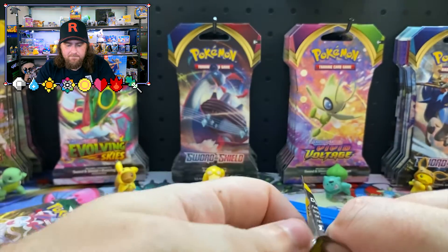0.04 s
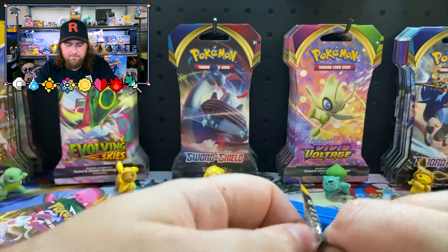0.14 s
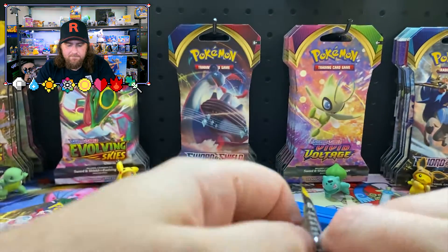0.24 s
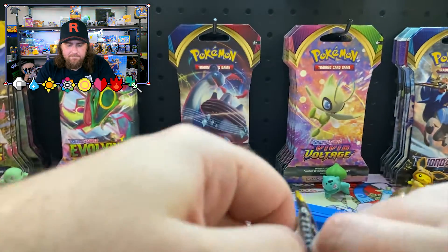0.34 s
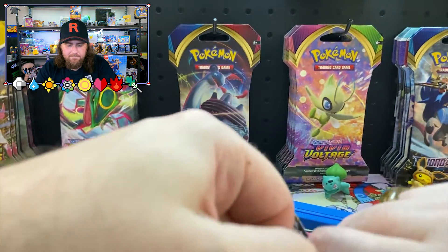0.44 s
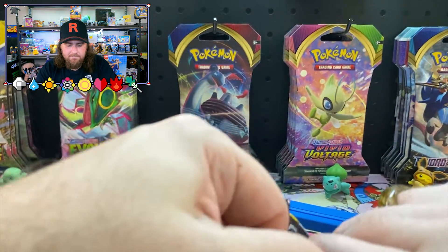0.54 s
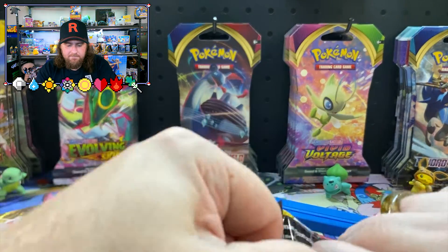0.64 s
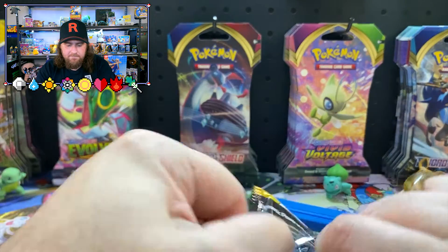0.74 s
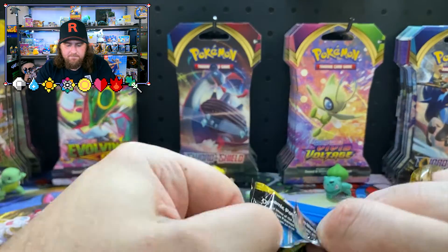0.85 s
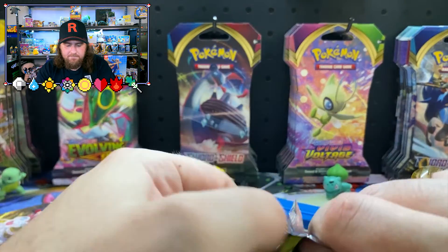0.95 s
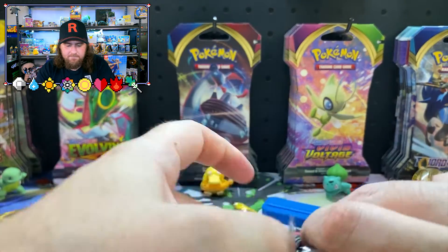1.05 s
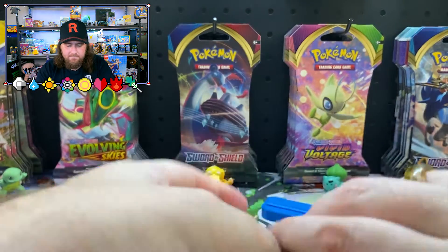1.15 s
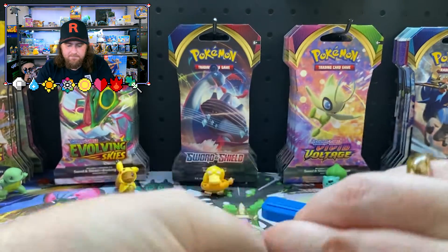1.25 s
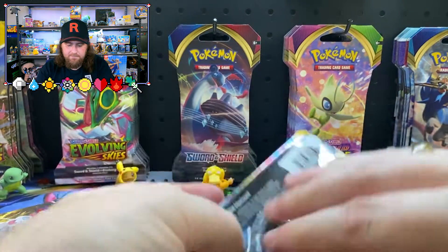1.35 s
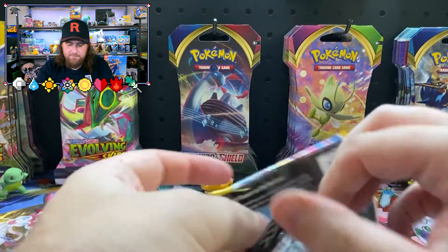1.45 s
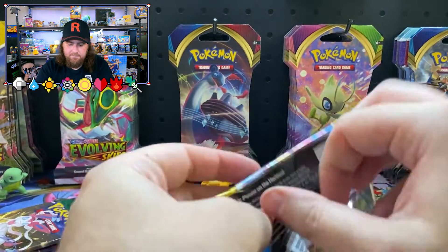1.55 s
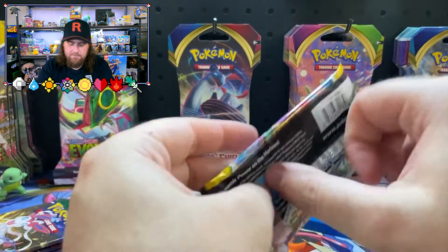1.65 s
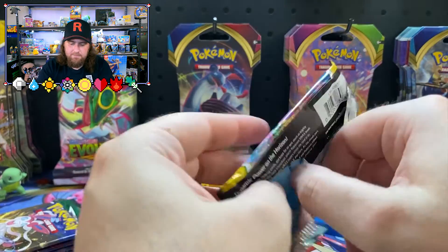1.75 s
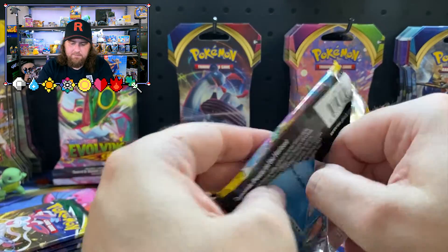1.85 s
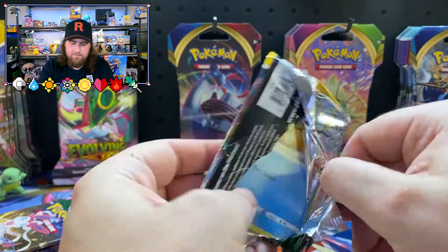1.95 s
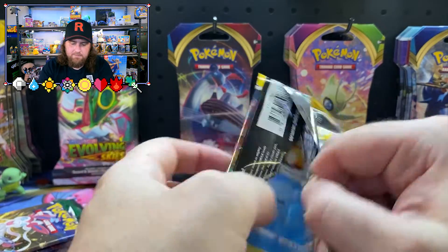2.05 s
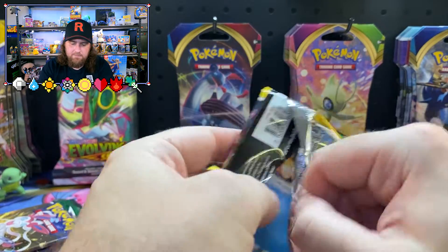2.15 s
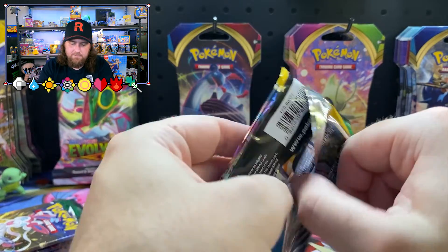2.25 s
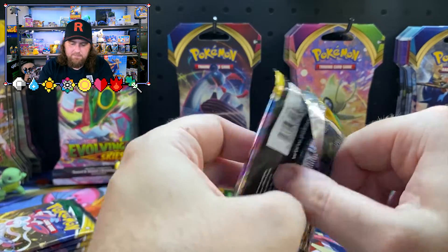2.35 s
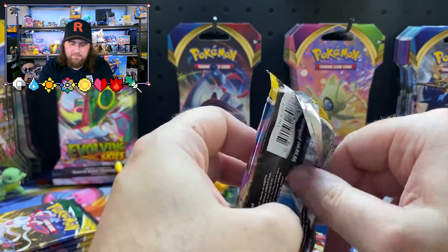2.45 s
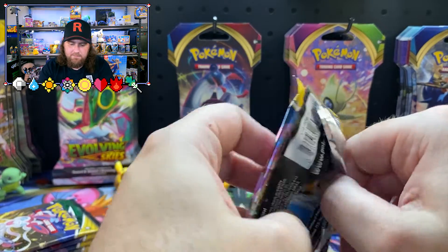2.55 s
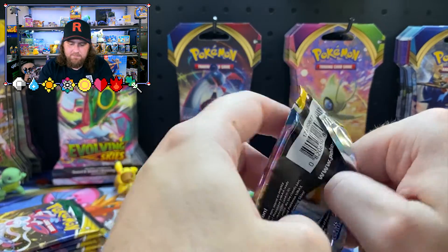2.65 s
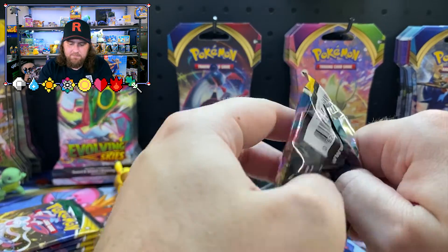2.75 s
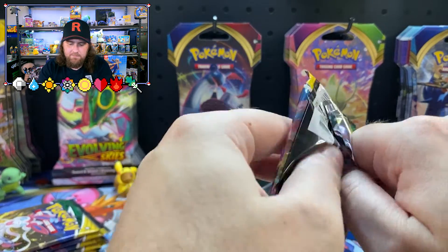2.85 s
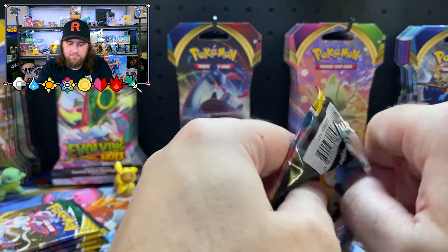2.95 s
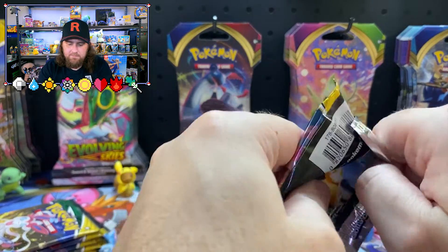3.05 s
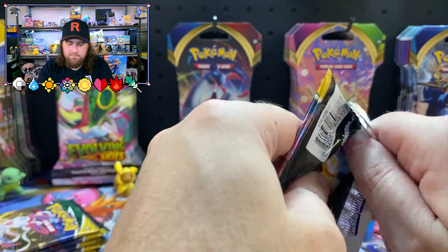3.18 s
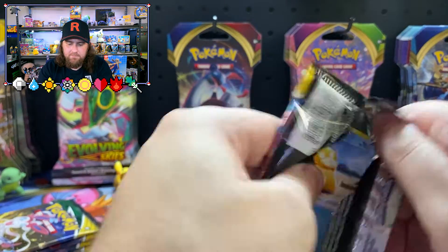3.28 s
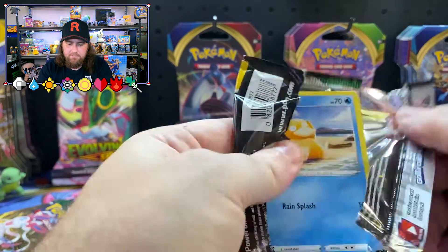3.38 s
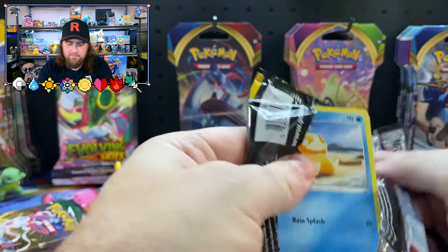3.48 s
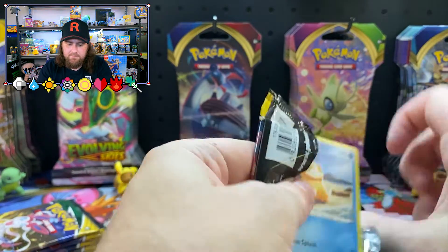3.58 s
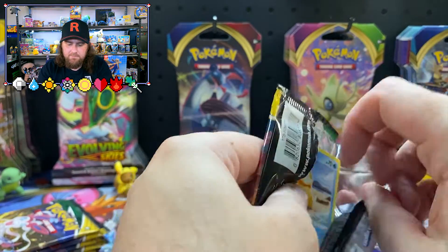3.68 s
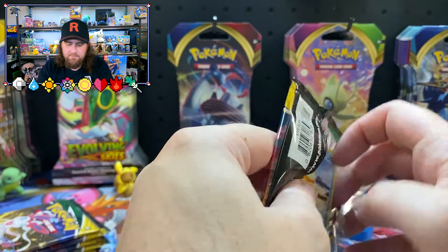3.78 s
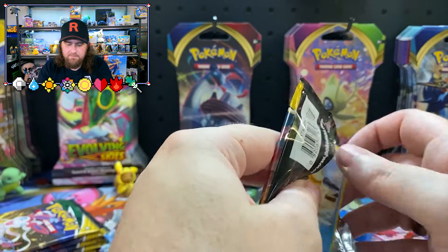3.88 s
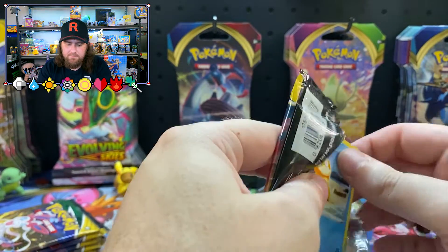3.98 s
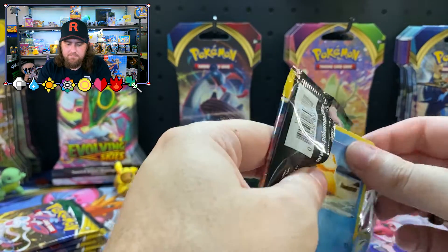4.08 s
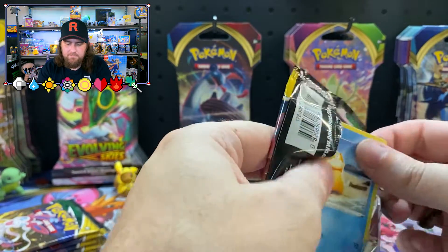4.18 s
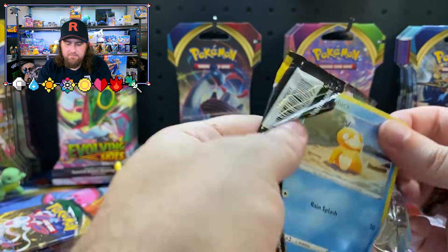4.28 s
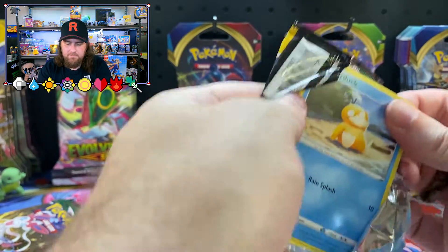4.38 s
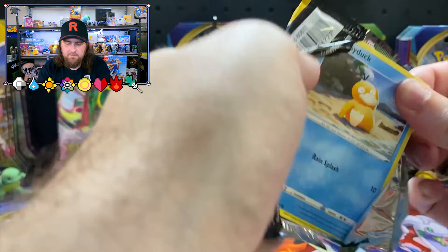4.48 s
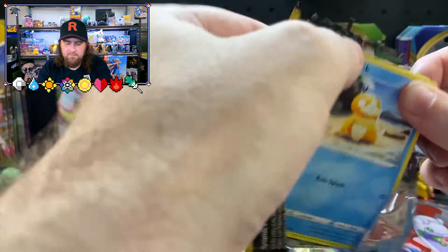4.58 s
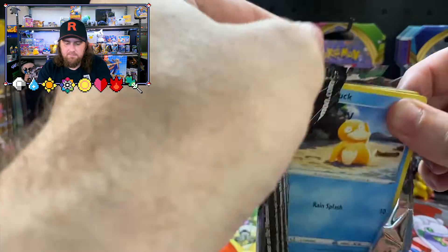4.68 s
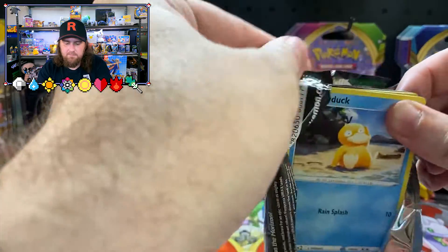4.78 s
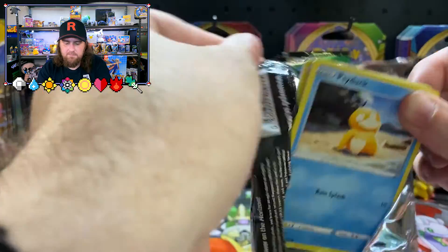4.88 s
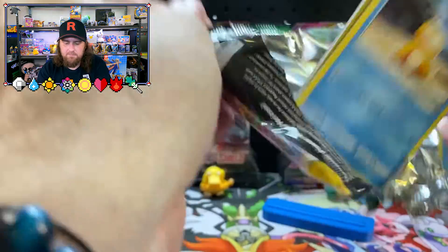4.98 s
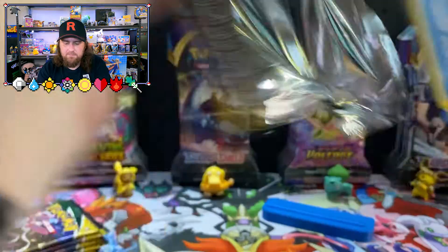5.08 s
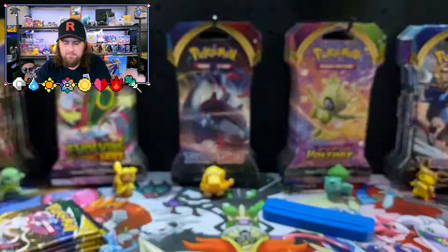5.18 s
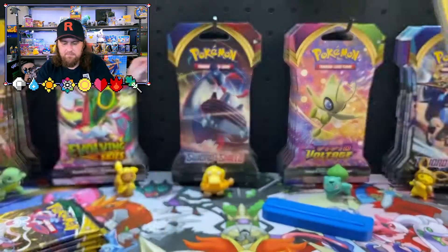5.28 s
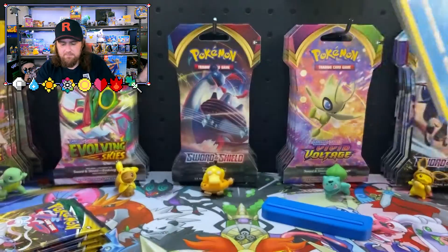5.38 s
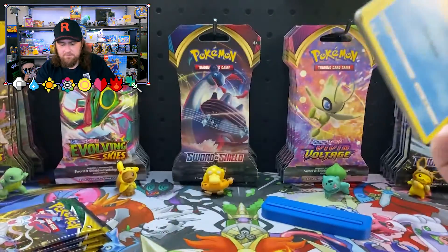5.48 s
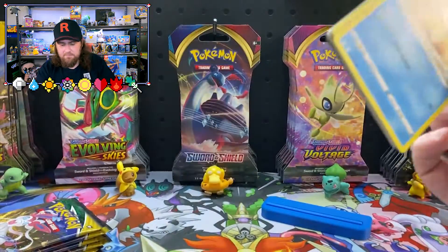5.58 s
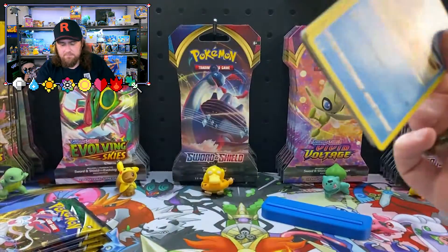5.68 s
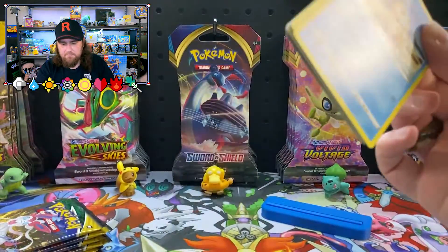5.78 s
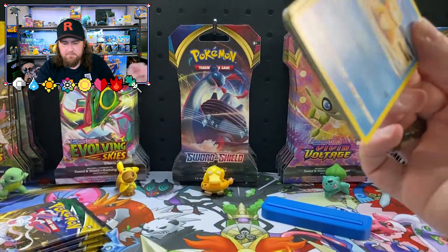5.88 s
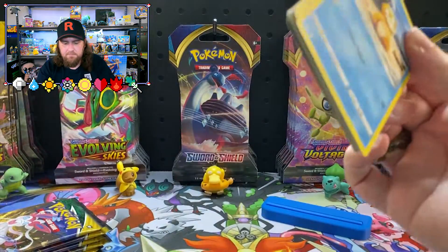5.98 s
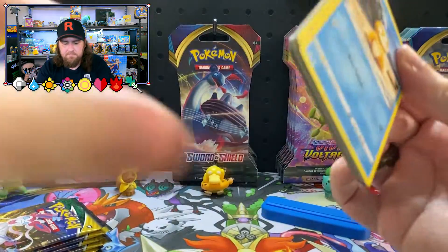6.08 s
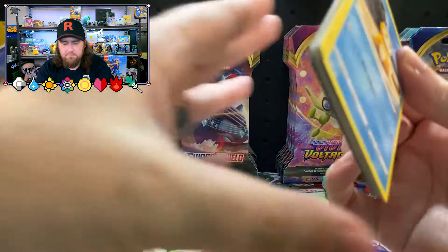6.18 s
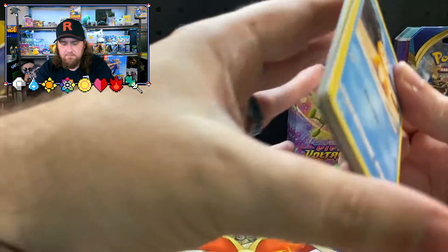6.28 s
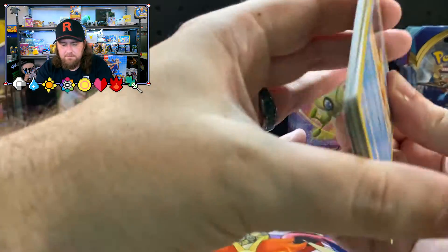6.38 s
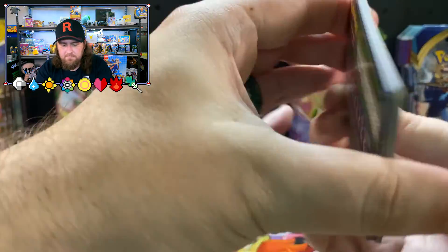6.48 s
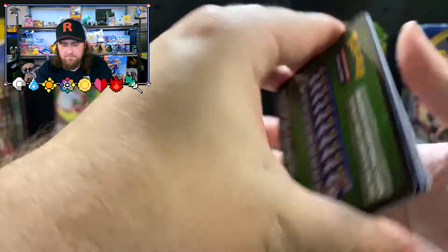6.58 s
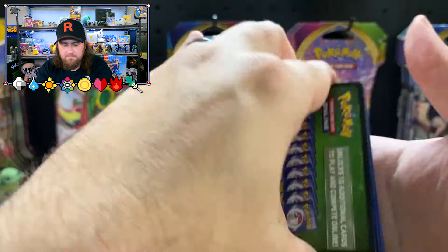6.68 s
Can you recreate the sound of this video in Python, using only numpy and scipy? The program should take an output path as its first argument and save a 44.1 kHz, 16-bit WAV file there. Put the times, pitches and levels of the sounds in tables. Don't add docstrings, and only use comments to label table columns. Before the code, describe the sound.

A close, dry take of foil being opened over a desk, with low air hiss and a faint wavering fan hum behind. From 0 to 0.7 seconds fingers squeeze the taut pack: fine crackle and small bright snaps. At about 0.8 the seam gives a loud sharp rip, then snaps scatter until 1.5 with soft knuckle bumps. From 1.65 to 2.65 the opening is spread in irregular crisp crinkles. Pulling tightens from 2.7, growing denser to the strongest tearing burst at 3.2 to 3.5, with a hollow papery rumble and another snap near 3.67. Lighter peeling runs from 3.8 to 4.4. Cards are drawn out from 4.5 to 5.2, rustling briskly with a hard snap near 5.1. The wrapper lands around 5.45 with clicks and a soft thud. Afterwards it is nearly quiet, with sparse thin card-edge ticks and a faint slide around 6.06.

```python
import sys
import numpy as np
from scipy import signal
from scipy.fft import rfft, irfft
from scipy.io import wavfile
from scipy.ndimage import uniform_filter1d

SR = 44100
rng = np.random.default_rng(int(sys.argv[2]) if len(sys.argv) > 2 else 0)


def waveform_to_disk(signal):
    frames = np.transpose(np.atleast_2d(signal))
    scaled = np.clip(frames, -1, 1) * 32767
    samples = np.round(scaled).astype(np.int16)
    wavfile.write(sys.argv[1], SR, samples)


def ratio(d):
    e = np.asarray(d, float) / 20
    return 10 ** e


N = 296793

# [f/Hz, level/dB per Hz]
AIR_SPECTRUM = [(12, -28), (20, 6.5), (138, -6.5), (210, -1.5), (347, -2.5), (472, -17), (590, -10.5),
                (923, -15.5), (1440, -16.5), (1810, -20), (2670, -29), (14300, -43.5), (16000, -40)]
# [f/Hz, width/Hz, level/dB]
FAN_NOTE = (208, 5.9, -63)

# [f/Hz, level/dB per Hz]
FOIL_SPECTRUM = [(800, -3), (1050, 3), (1500, -0.5), (2300, -3), (3000, 0), (4600, 1), (6500, -7),
                 (10000, -5), (15000, -15)]
# [t/s of firmest grip, crackle level/dB, build/s per 10 dB, ease/s per 10 dB]
SQUEEZES = [(.1, -57.5, 0, -0.17), (.36, -48.5, -0.3, -0.5), (.72, -64, 0.5, -3.4), (1.1, -53.5, 0.3, 0.17),
            (1.5, -58.5, 0.37, 0.25), (1.75, -60, 0.17, .06), (1.95, -59, 0.32, -0.5),
            (2.17, -45, -0.01, 0.11), (2.27, -54.5, 0.15, 0.1), (2.6, -53, 0.2, -0.1),
            (2.85, -50.5, 0.35, 0), (3.08, -47.5, 0.13, -0.12), (3.24, -42, 0.13, -0.04),
            (3.5, -55.5, -1, 0.06), (3.67, -34.5, -0.02, 0.042), (3.88, -42.5, 0, -0.03),
            (4.1, -46, .11, -0.03), (4.71, -48, 0.03, -0.08), (4.93, -53.5, -0.52, 0.25),
            (5.19, -46, 0.1, -0.1), (5.45, -70, .4, 0.5), (6.7, -65.5, -0.7, .3)]
RESTING_DB = -72

# [t/s, level/dB, ring f/Hz, edge level/dB rel, above 8 kHz]
PINCH_SNAPS = [(0.101, -36, 4800, -9), (0.3116, -33, 4500, -26), (0.485, -49, 7900, -14),
               (0.513, -41.5, 4100, -2), (0.5395, -30, 7700, -10), (0.5383, -42, 4140, -10),
               (0.5583, -28.5, 4320, -10), (0.5814, -30, 4540, -26), (0.6046, -44, 4040, -7),
               (0.7416, -35.5, 4400, -14), (0.774, -44, 5280, -16), (0.784, -32, 5310, -12),
               (0.7932, -21.5, 4630, -16)]
# [t/s, level/dB, ring f/Hz, edge level/dB rel, above 8 kHz]
DROP_SNAPS = [(5.3675, -40, 2120, -2.5), (5.3871, -36.5, 2960, -5), (5.441, -24.5, 5850, -5),
              (5.451, -32, 3620, -4), (5.455, -26, 2600, -2), (5.4724, -35, 2740, -5),
              (5.4842, -36, 2720, -11), (5.7385, -32.5, 5230, -7), (5.895, -58, 2240, 1),
              (6.0343, -48.5, 3610, -3), (6.2526, -36.5, 7740, 3), (6.274, -41.5, 7890, -7),
              (6.4628, -47.5, 8230, -6)]
# [t/s, level/dB, ring f/Hz,
# panel level/dB rel, below 1.8 kHz]
LOOSE_SNAPS = [(0.7753, -41, 5500, -22), (0.7753, -41, 5400, -27), (0.7952, -19.5, 3000, -25),
               (0.8037, -25, 4700, -28), (0.8033, -14.5, 4650, -20), (0.8636, -17, 3040, -13),
               (0.927, -27.5, 4560, -22), (0.9421, -24, 3220, -14.5), (0.9713, -29.5, 4530, -15),
               (1.0078, -52, 5490, -2), (1.0078, -29, 3980, -20), (1.0352, -26, 4160, -12),
               (1.0736, -38, 3140, -8), (1.0715, -26, 3230, -13), (1.1723, -37.5, 2220, -11),
               (1.173, -32, 4080, -17), (1.269, -37.5, 4440, -4), (1.2926, -37, 5170, -15),
               (1.3779, -23, 3600, -17), (1.3791, -24, 4230, -35), (1.4606, -30.5, 4330, -10.5),
               (1.497, -47, 4100, -8), (1.5147, -36, 5070, -24),
               (1.6566, -30, 3900, -17), (1.6729, -22, 4070, -12), (1.719, -23.5, 7170, -23),
                (1.8122, -27, 4760, -31), (1.8503, -39, 3470, -16), (1.885, -40.5, 4300, -10),
                (1.9176, -44, 4160, 4), (1.9178, -31, 4770, -14), (1.963, -34, 7100, -21),
                (1.9804, -37, 5550, -17), (2.0037, -34.5, 4800, -9.5), (2.0373, -42, 7080, -11),
                (2.0369, -22.5, 4810, -18.5), (2.0555, -18.5, 5150, -8), (2.1163, -29.5, 4170, -5),
                (2.1281, -23, 5300, -16), (2.1549, -27, 3570, -13), (2.2487, -28.5, 5200, -19),
                (2.2965, -30, 4250, -20), (2.334, -32, 4000, -30), (2.3452, -21.5, 5330, -29),
                (2.4, -27.5, 2200, -11), (2.458, -35.5, 3960, -14), (2.5036, -24, 5600, -20),
                (2.5617, -35, 5460, -10), (2.5681, -36, 5430, -11), (2.5686, -24.5, 4300, -21),
                (2.614, -35, 4290, -17), (2.633, -21, 2870, -27),
               (2.7223, -46, 2900, -22), (2.7355, -32, 4100, -15), (2.7689, -29.5, 3950, -8),
              (2.7961, -51, 2980, 0), (2.797, -32, 2970, -25), (2.8198, -35.5, 4120, -2.5),
              (2.833, -38, 7620, -4), (2.834, -22, 4240, -9), (2.852, -27, 5720, -9),
              (2.8751, -28.5, 2920, -5), (2.9515, -43.5, 3420, -18), (2.9768, -35.5, 2940, -3.5),
              (2.991, -33.5, 3590, -30), (3.0063, -27.5, 4760, -18.5), (3.0331, -30.5, 2920, -12.5),
              (3.0643, -19.5, 4490, -23), (3.104, -25.5, 3930, -15), (3.1483, -20.5, 2970, -20),
              (3.1942, -36, 3480, 1), (3.1938, -16, 4010, -22.5), (3.2391, -22, 3910, -18),
              (3.2455, -15, 4950, -28.5), (3.2957, -19, 5450, -45.5), (3.3166, -23.5, 2920, -21),
               (3.2962, -17, 5410, -47), (3.318, -21.5, 5020, -21.5), (3.3308, -21.5, 3930, -10),
               (3.3693, -13.5, 3300, -16.5), (3.378, -14, 4880, -17), (3.4035, -17.5, 3425, -14),
               (3.4149, -14.5, 3460, -23), (3.449, -19.5, 4900, -17), (3.451, -20.5, 3910, -2.5),
               (3.5228, -30, 5000, -32.5), (3.5585, -39, 5250, -7), (3.5595, -25.5, 3890, -43),
               (3.5845, -42, 8930, -7.5), (3.5859, -26.5, 5280, -15), (3.6104, -31, 2770, -26),
               (3.6333, -29, 5200, -17), (3.666, -32, 4130, -8.5), (3.667, -16.5, 3800, -24),
               (3.769, -40, 6300, -5),
               (3.7693, -32, 6140, -13.5), (3.8087, -34, 4900, -9), (3.8459, -41, 3100, -11),
              (3.8714, -31.5, 6500, -13), (3.9508, -36.5, 4010, -11), (3.9695, -24, 6600, -13),
              (4.0238, -36.5, 4630, -6), (4.0359, -29.5, 5900, -7.5), (4.0888, -26.5, 5900, -11),
              (4.144, -34, 5900, -11), (4.1916, -44.5, 4960, -8), (4.3103, -42, 3770, -19),
              (4.3225, -28.5, 4000, -22), (4.358, -34, 4900, -26), (4.3685, -30, 4230, -17),
              (4.4052, -33, 4250, -16),
               (4.538, -39.5, 3700, -7), (4.5635, -42.5, 3070, -2), (4.5787, -34, 4000, -8),
              (4.5948, -24.5, 3030, -5.5), (4.6237, -31, 4730, -16), (4.66, -42.5, 6540, -17),
              (4.6767, -31.5, 3120, -10), (4.7139, -22, 4600, -11), (4.7139, -23, 2970, -6.5),
              (4.835, -24, 3500, -18), (4.8434, -29, 3010, -8), (4.8437, -23.5, 4640, -19),
              (4.867, -38, 3050, -24), (4.9137, -30, 2980, -13.5), (4.9369, -23.5, 3050, -20),
              (4.9732, -26, 3090, -12), (5.006, -25.5, 4200, -19), (5.0462, -38, 2890, -17),
              (5.0733, -25.5, 4400, -15), (5.0912, -14, 3010, -18), (5.15, -32, 5700, -23),
              (5.1617, -37, 2770, -17), (5.1782, -21.5, 3140, -22.5)]
TAUT_PANEL_DB = -27.5
LOOSE_EDGE_DB, EDGE_DB_PER_OCTAVE, EDGE_SCATTER_DB = -9, 3.0, 2.5
CARDS_FROM_S = 5.6

# [t/s of peak, foil level/dB, body level/dB, build/s, ease/s per 10 dB]
TUGS = [(0.807, -12.5, -41.5, -0.15, -0.1249), (0.853, -28, -47, -0.003, 0.1269),
        (2.01, -35.5, -56, -0.01, 0.14), (2.064, -33.5, -70, 0.01, -0.08),
        (3.342, -31, -56.5, 0.01, 0.0836), (3.371, -28, -53, -0.0771, 0),
        (3.407, -30, -39.5, 0.1187, 0.0973), (3.454, -18.5, -30.5, 0, -0.0138),
        (4.368, -35, -60.5, .045, .036), (5.071, -34, -56, 0.1, 0.0135),
        (5.096, -27.5, -50, 0.0229, -0.0967), (6.061, -47.5, -59, -0.04, -0.05)]
# [f/Hz, level/dB per Hz]
BODY_SPECTRUM = [(130, -14), (290, 0), (600, -1), (1000, -7), (1500, -15), (2500, -30)]
BODY_LAGS = 0.95

# [t/s, peak level/dB, f/Hz]
BUMPS = [(.942, -34, 564), (1.072, -37.5, 660), (1.172, -40, 530), (2.398, -35.5, 315), (3.24, -35, 250),
         (3.866, -36, 295), (4.084, -36, 222), (4.714, -35.5, 453), (5.069, -37.5, 116), (5.178, -41, 149),
         (5.453, -29.5, 320), (5.455, -34.5, 126)]

# [delay/ms, level/dB, dull above f/Hz]
DESK_ECHO = (1.425, -15, 2400)
# [f/Hz, T60/s]
ROOM_T60 = [(500, .3), (1500, .33), (4000, .38), (9000, .36), (14000, .27)]


def rms_one(x):
    return x / np.sqrt(np.mean(x ** 2) + 1e-20)


def read_curve(hz, points):
    point_hz, values = np.array(points).T
    return np.interp(np.log(hz), np.log(point_hz), values)


def colour(x, points):
    hz = np.maximum(np.arange(len(x) // 2 + 1) * SR / len(x), 1)
    return rms_one(irfft(rfft(x) * ratio(read_curve(hz, points)), len(x)))


def resonate(x, hz, width_hz):
    r = np.exp(-np.pi * max(width_hz, 1) / SR)
    zeros = [(1 - r * r) / 2, 0, (r * r - 1) / 2]
    poles = [1, -2 * r * np.cos(2 * np.pi * hz / SR), r * r]
    return signal.lfilter(zeros, poles, x)


def drift(rate_hz):
    knots = rng.standard_normal(4000)
    return np.interp(np.arange(N) * rate_hz / SR, np.arange(len(knots)), knots)


def add(out, s, sound):
    i = max(round(s * SR), 0)
    out[i:i + len(sound)] += sound[:N - i]


def effort(s, build_s, ease_s):
    t = np.arange(N) / SR - s
    return -10 * np.where(t < 0, -t / max(build_s, .002), t / max(ease_s, .002))


def background():
    hz, width_hz, db = FAN_NOTE
    fan = rms_one(resonate(rng.standard_normal(N), hz, width_hz))
    air = colour(rng.standard_normal(N), AIR_SPECTRUM)
    return ratio(-56.5) * air + ratio(db) * fan


def grains(per_s, uneven_db, clump_db, clump_rate, cycles):
    sizes = ratio(uneven_db * np.minimum(rng.exponential(1, N), 3)) * rng.choice([-1, 1], N)
    born = rng.random(N) < per_s * ratio(clump_db * drift(clump_rate)) / SR
    pitches = np.geomspace(800, 15000, 16)
    dealt = rng.integers(0, 16, N)
    mix = np.zeros(N)
    for k, (hz, db) in enumerate(zip(pitches, read_curve(pitches, FOIL_SPECTRUM))):
        hits = sizes * born * (dealt == k) + 1e-18
        ring = resonate(resonate(hits, hz, hz / cycles), hz, hz)
        mix += ratio(db) * np.sqrt(hz) * rms_one(ring)
    return rms_one(mix)


def crackle(rub_db=-5):
    squeezes_db = [np.maximum(db + effort(s, *shape), RESTING_DB) for s, db, *shape in SQUEEZES]
    level_db = np.max(squeezes_db, axis=0)
    ticks = grains(per_s=900, uneven_db=8.0, clump_db=8.5, clump_rate=58, cycles=13.0)
    rub = colour(rng.standard_normal(N), [(200, -39.5)] + FOIL_SPECTRUM)
    rub = rub * ratio(4.5 * drift(60))
    firm = np.clip((level_db + 74) / 14, 0, 1)
    return ratio(level_db + 1.0) * (firm * ticks + ratio(rub_db) * rub)


def creases():
    rows = [(s, db, hz, TAUT_PANEL_DB, edge_db) for s, db, hz, edge_db in PINCH_SNAPS + DROP_SNAPS]
    loose = LOOSE_SNAPS
    scatter_db = EDGE_SCATTER_DB * rng.standard_normal(len(loose))
    for (s, db, hz, panel_db), luck_db in zip(loose, scatter_db):
        edge_db = LOOSE_EDGE_DB + EDGE_DB_PER_OCTAVE * np.log2(hz / 4500) + luck_db
        rows.append((s, db, hz, panel_db, min(edge_db, -1)))
    return rows


def loudest_one(x):
    return x / np.sqrt(uniform_filter1d(x ** 2, size=66).max())


def snap_jolt(ms, rise_ms=0.45, fall_ms=0.47, after_ms=2.5, after_db=-24, early_db=-22):
    late = np.maximum(ms, 0)
    fall = np.exp(-late / fall_ms) + ratio(after_db) * np.exp(-late / after_ms)
    jolt = (1 - np.exp(-(late / rise_ms) ** 2)) * fall
    return jolt / jolt.max() + ratio(early_db) * np.exp(-np.abs(ms) / 4.0)


def snaps(broad_db=-3, panel_hz=930, panel_width_hz=350, edge_hz=12000, gain_db=-2):
    out = np.zeros(N)
    jolt = snap_jolt(np.arange(1100) / SR * 1000 - 4)
    foil_filter = signal.butter(2, [8000, edge_hz], "band", fs=SR, output="sos")
    card_filter = signal.butter(2, 9000, "high", fs=SR, output="sos")
    mid_filter = signal.butter(3, [2700, 7500], "band", fs=SR, output="sos")
    for s, db, hz, panel_db, edge_db in creases():
        ring_hit, edge_hit, panel_hit = rng.standard_normal((3, len(jolt))) * jolt
        crease = loudest_one(resonate(resonate(ring_hit, hz, .45 * hz), hz, hz))
        broad = loudest_one(signal.sosfilt(mid_filter, edge_hit))
        crease = loudest_one(crease + ratio(broad_db) * broad)
        edge = loudest_one(signal.sosfilt(foil_filter if s < CARDS_FROM_S else card_filter, edge_hit))
        pitch = panel_hz * np.exp(rng.uniform(-0.24, 0.18))
        panel = resonate(resonate(panel_hit, pitch, panel_width_hz), pitch, 3 * panel_width_hz)
        share = np.sqrt(max(1 - ratio(edge_db) ** 2, .05))
        snap = share * crease + ratio(edge_db) * edge + ratio(panel_db) * loudest_one(panel)
        add(out, s - .0051, ratio(db + gain_db) * snap)
    return out


def rips():
    spray = grains(per_s=5000, uneven_db=3.5, clump_db=4.5, clump_rate=220, cycles=5.5)
    sheen = spray - signal.sosfilt(signal.butter(2, 6500, fs=SR, output="sos"), spray)
    rumble = colour(rng.standard_normal(N), BODY_SPECTRUM) * ratio(2.5 * drift(120))
    out = np.zeros(N)
    for s, foil_db, body_db, *shape in TUGS:
        below_db = effort(s, *shape)
        deep = np.clip((body_db - foil_db + 20) / 9, 0, .9)
        out += ratio(foil_db - 7.0 + below_db) * (spray - deep * sheen)
        out += ratio(body_db + BODY_LAGS * below_db) * rumble
    return out


def bumps(cycles=0.93, puff_db=-6):
    out, t = np.zeros(N), np.arange(3000) / SR
    for s, db, hz in BUMPS:
        puff = rms_one(signal.lfilter([.06], [1, -.94], rng.standard_normal(len(t))))
        shape = (1 - np.exp(-t * hz / .22)) * np.exp(-t * hz / cycles)
        push = np.sin(2 * np.pi * hz * t)
        add(out, s, ratio(db + 3.5) * shape * (push + ratio(puff_db) * puff))
    return out


def desk(x):
    late_ms, db, hz = DESK_ECHO
    echo = np.interp(np.arange(N) - late_ms * SR / 1000, np.arange(N), x)
    return x - ratio(db) * signal.sosfilt(signal.butter(2, hz, fs=SR, output="sos"), echo)


def room(x, first_ms=6.0, level_db=-18):
    t = np.arange(SR // 2) / SR
    tail = np.zeros(len(t))
    edges = 300 * 2 ** np.arange(0, 6.1, .75)
    for low, high in zip(edges, edges[1:]):
        t60 = read_curve(np.sqrt(low * high), ROOM_T60)
        band_filter = signal.butter(2, [low, high], "band", fs=SR, output="sos")
        band = signal.sosfilt(band_filter, rng.standard_normal(len(t)))
        tail += band * ratio(-60 * t / t60)
    tail = tail * (1 - np.exp(-(t * 1000 / first_ms) ** 2))
    return ratio(level_db) * signal.fftconvolve(x, tail / np.sqrt(np.sum(tail ** 2)))[:N]


def scene():
    hands = desk(crackle() + snaps() + rips()) + bumps()
    return (hands + room(hands) + background())[None]


def band_limit(x):
    return signal.sosfilt(signal.butter(12, 16980, fs=SR, output="sos"), x)


def record(dry):
    rolled = signal.sosfilt(signal.cheby1(6, 1, 16000, fs=SR, output="sos"), dry)
    return band_limit(rolled)


dry = scene()
out = record(dry)
waveform_to_disk(out)
```